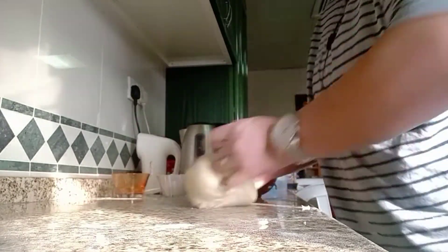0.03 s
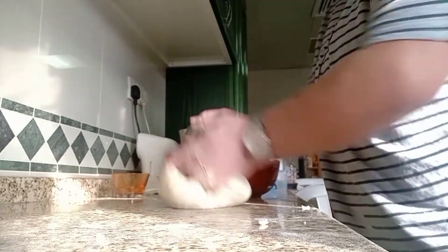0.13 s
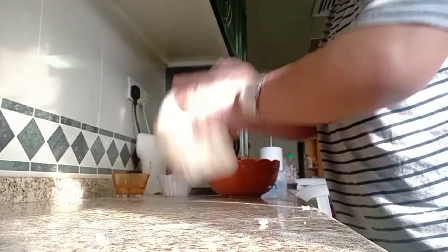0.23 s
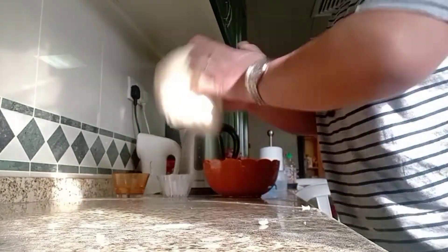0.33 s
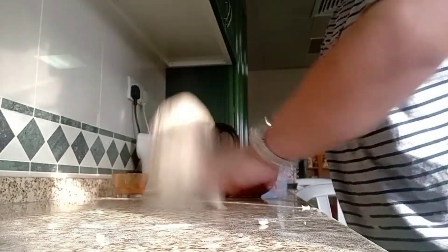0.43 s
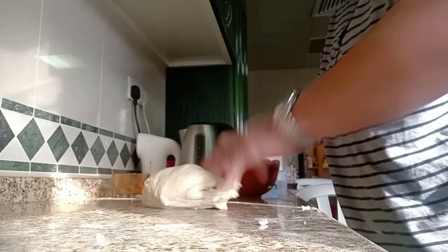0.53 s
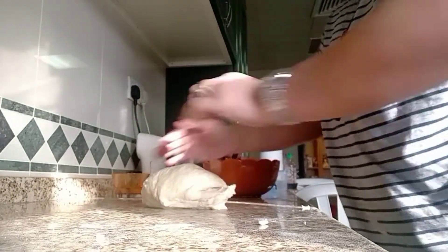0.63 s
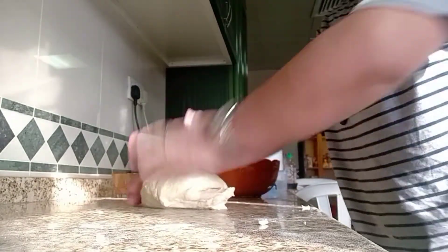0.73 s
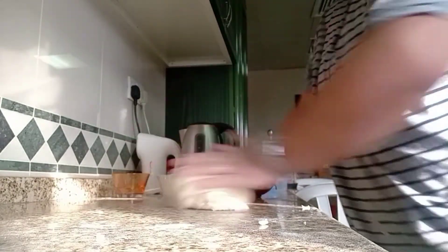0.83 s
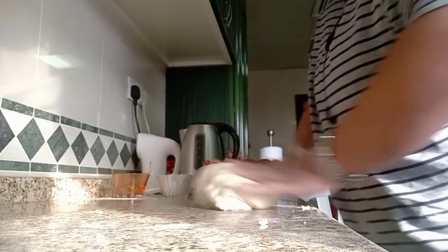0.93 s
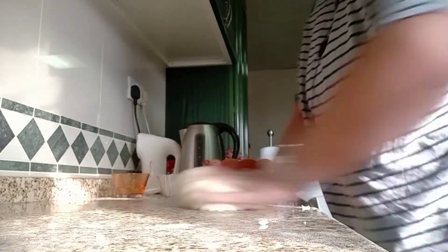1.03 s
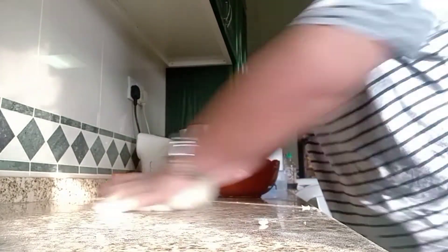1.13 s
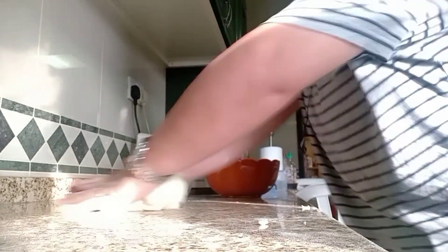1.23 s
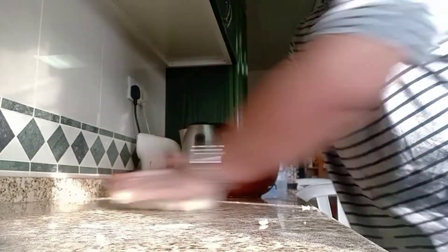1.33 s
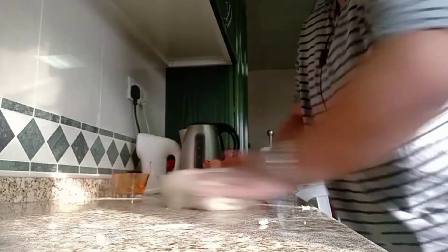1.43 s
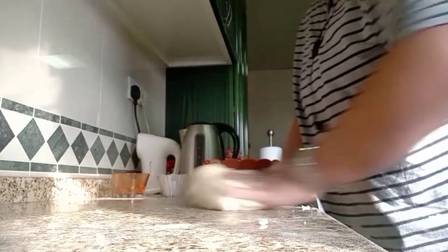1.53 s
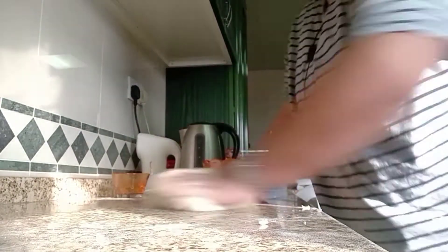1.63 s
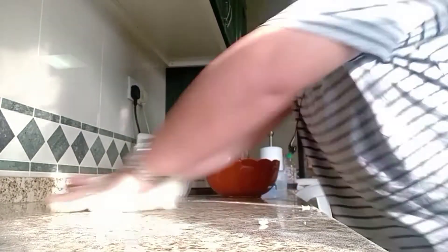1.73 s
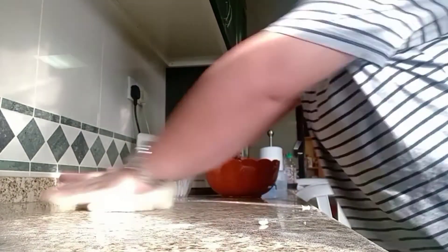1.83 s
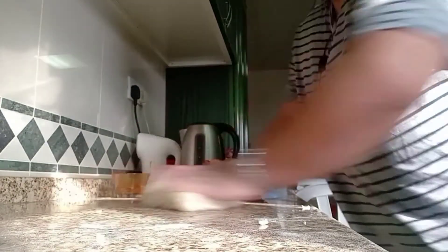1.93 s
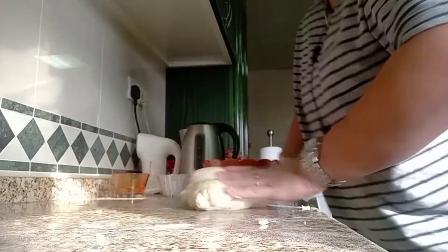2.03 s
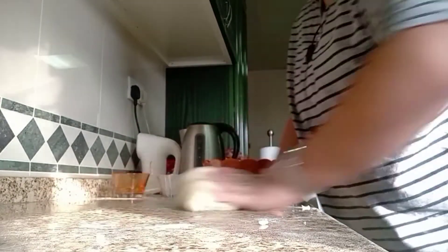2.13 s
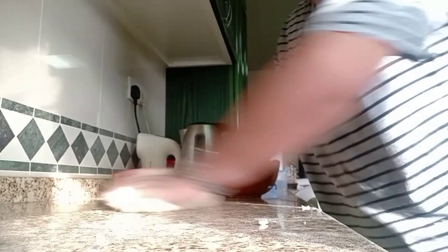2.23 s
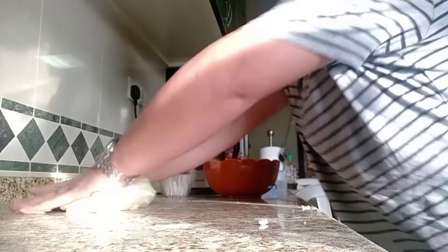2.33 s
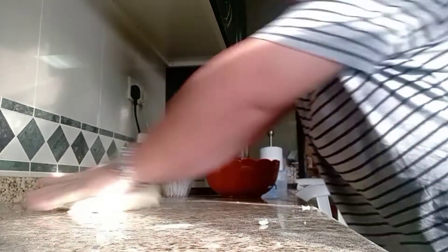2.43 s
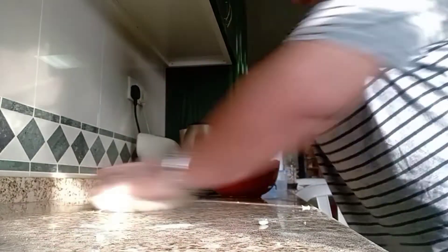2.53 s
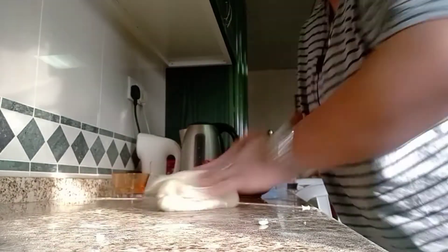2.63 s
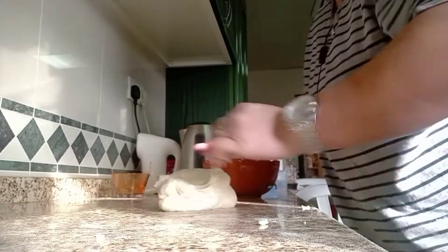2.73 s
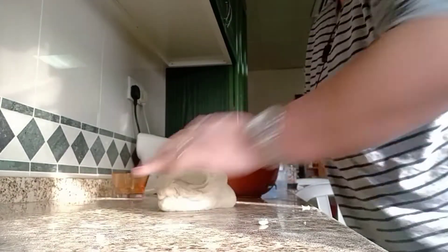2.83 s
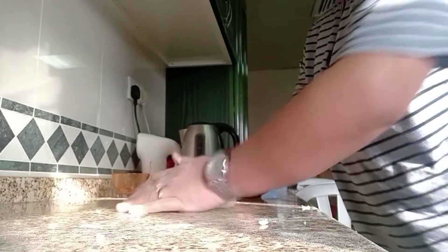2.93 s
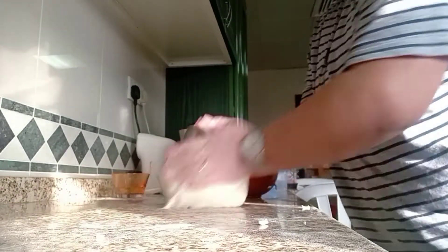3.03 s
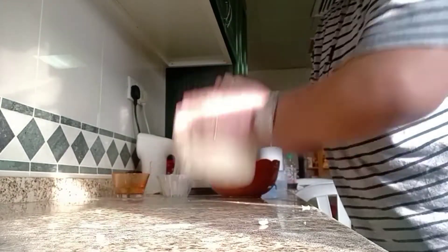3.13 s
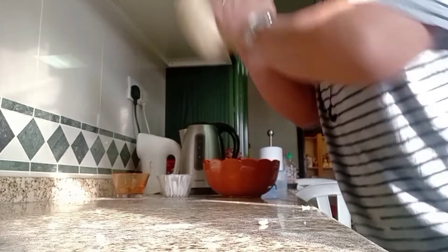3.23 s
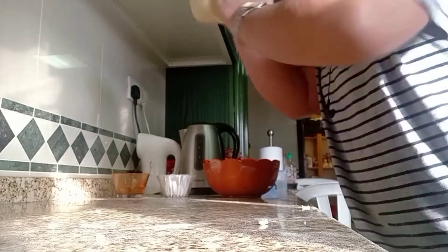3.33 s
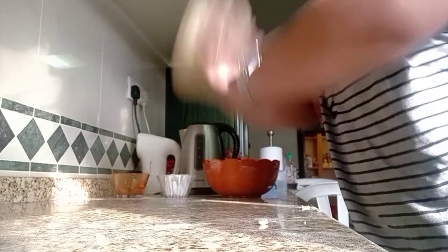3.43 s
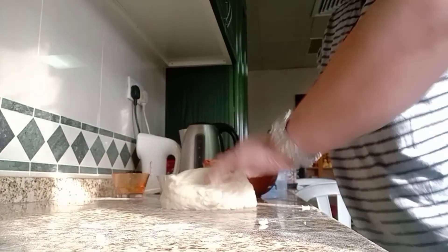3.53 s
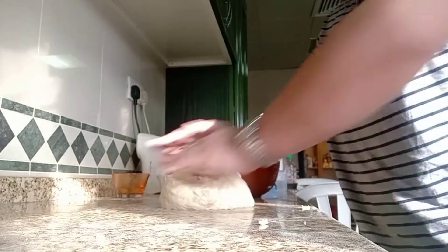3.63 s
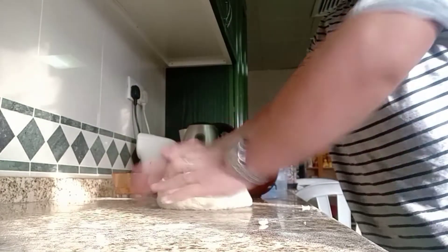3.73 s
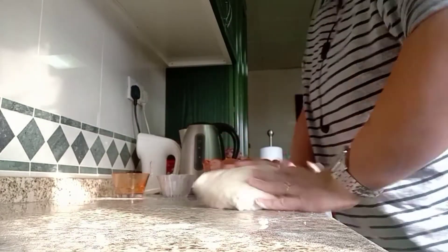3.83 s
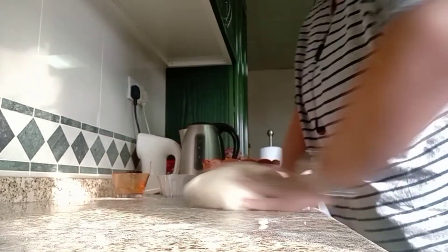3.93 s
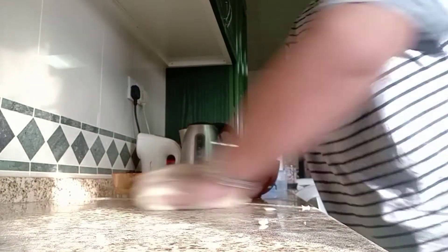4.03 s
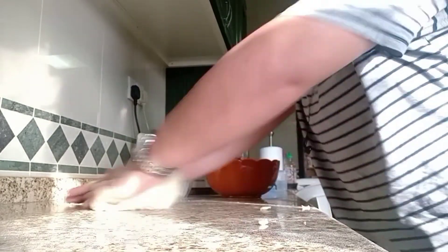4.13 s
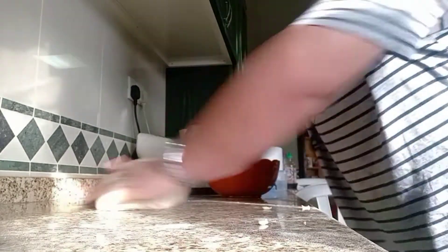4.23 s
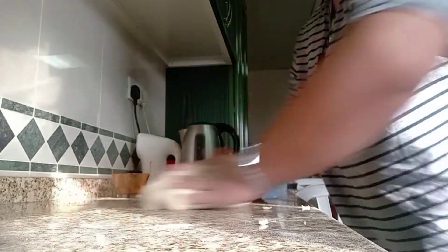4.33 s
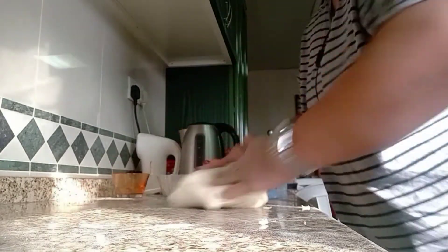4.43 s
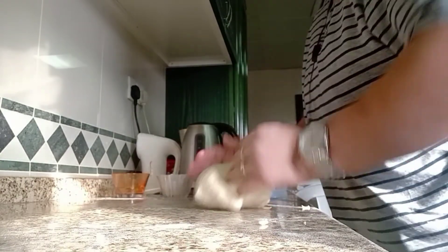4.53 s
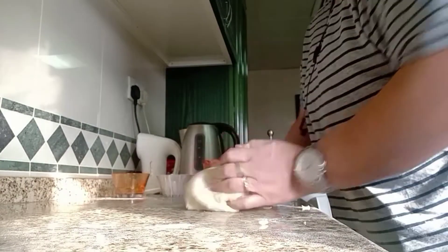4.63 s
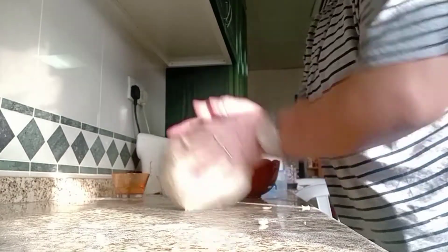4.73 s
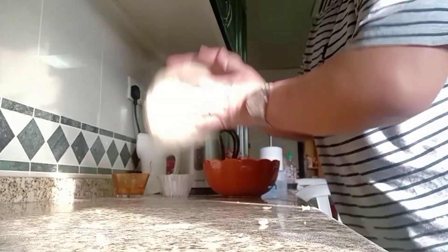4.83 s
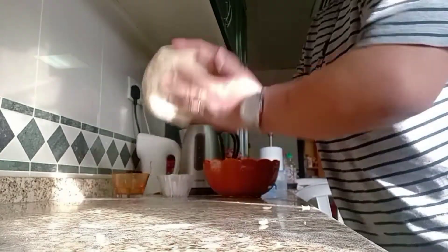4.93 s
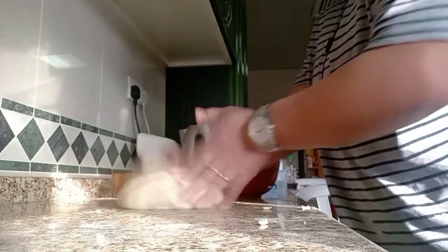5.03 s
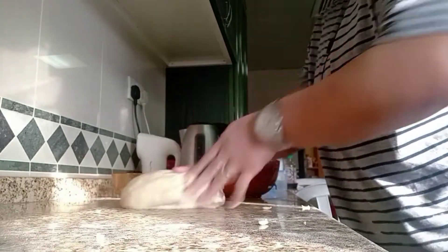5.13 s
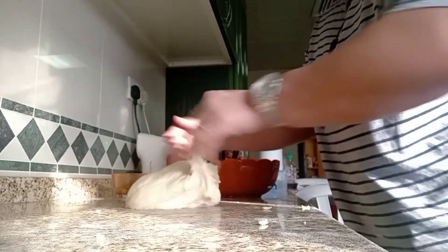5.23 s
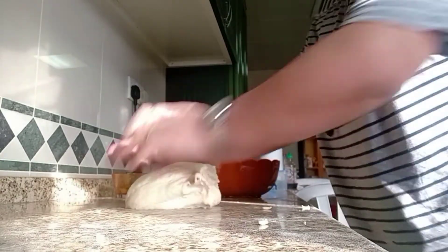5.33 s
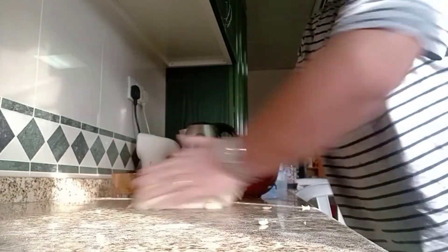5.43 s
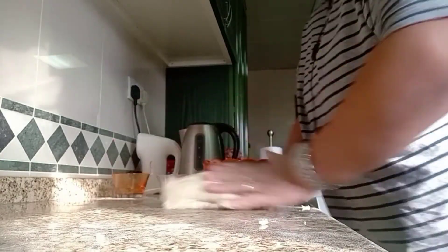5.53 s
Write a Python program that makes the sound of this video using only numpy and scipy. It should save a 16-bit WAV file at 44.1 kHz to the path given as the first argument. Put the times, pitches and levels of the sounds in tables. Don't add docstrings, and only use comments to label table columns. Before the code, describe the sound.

A low, wavering hum around 100 Hz, soft airy noise and a faint thin whine from an appliance run throughout, very quiet. Palms brush lightly over a floured stone counter at the start. At 0.4 s dough hits the counter: a loud, sharp wet clap with a hollow wooden knock, a low cabinet thump and a lively tiled-room ring of under a second. A small finger pat follows at 0.75 s. From about 0.85 to 3.1 s soft, uneven hisses of skin and dough come in strokes, several a second at times, with a dull push near 2.8 s. A softer, more midrange slap lands at 3.4 s, then a sticky tick and push at 3.7 s and more rubbing until 4.8 s, with a muffled push at 4.55 s. At 5.0 s a heavy slap booms; sticky pats at 5.3 s and a faint rub end it.

```python
import sys
import numpy as np
from scipy import signal
from scipy.fft import rfft, irfft, next_fast_len
from scipy.io import wavfile
from scipy.ndimage import uniform_filter1d, map_coordinates

SR = 44100
rng = np.random.default_rng(int(sys.argv[2]) if len(sys.argv) > 2 else 0)


def how_loud(loudness_db):
    steps = np.asarray(loudness_db, float) / 20
    return 10 ** steps


def transcribe(u):
    v = np.clip(np.atleast_2d(u).T, -1, 1)
    q = np.round(v * 32767).astype(np.int16)
    wavfile.write(sys.argv[1], SR, q)


N = 246078

# freq_hz, density_db (per Hz)
SKIN_COLOUR = [(1710, -22.5), (2900, -1), (3340, -2), (3680, -5), (4040, -3), (4440, -6.5), (6250, 1),
               (7500, -5), (8100, -19), (9000, -28), (11700, -47.5), (19800, -120)]
# freq_hz, density_db (per Hz)
FIZZ_COLOUR = [(5000, -31), (8500, 1.5), (10700, -6), (11600, -4), (12800, -6), (14900, 1), (15600, -0.5)]


def unit(x):
    return x / np.sqrt(np.mean(x ** 2) + 1e-20)


def along(points, hz):
    f, v = np.transpose(points)
    return np.interp(np.log(hz + 1), np.log(f + 1), v)


def shade(points):
    return lambda hz: how_loud(along(points, hz))


def wobble(rate):
    knots = rng.standard_normal(int(N * rate / SR) + 4)
    return map_coordinates(knots, [np.arange(N) * rate / SR])


def rush(gain, size=N):
    # freq_hz, left_right_likeness (-1 to 1)
    likeness = [(60, 0.99), (130, 0.86), (290, 0.74), (640, 0.31), (1410, -0.23), (3100, 0.12),
                (6820, -0.12), (15000, 0.51)]
    # freq_hz, left_over_right_db
    tilt = [(60, 5.5), (110, 1.5), (200, 7), (380, -3.5), (700, 2.5), (1290, 1), (2380, 4), (4400, -2),
            (8120, 4.5), (15000, 13.5)]
    m = next_fast_len(size + 8192)
    hz = np.fft.rfftfreq(m, 1 / SR)
    turn = np.arccos(np.clip(along(likeness, hz), -1, 1)) / 2
    noise = rfft(rng.standard_normal((2, m)))
    mid, side = noise * gain(hz) * [np.cos(turn), np.sin(turn)]
    balance = how_loud(along(tilt, hz) / 2)
    return unit(irfft([(mid + side) * balance, (mid - side) / balance], m)[:, :size])


def patchy(x, depth_db):
    z = signal.stft(x, nperseg=512)[2]
    field = rng.standard_normal(z.shape[1:])
    field = uniform_filter1d(field, size=4, axis=0)
    field = uniform_filter1d(field, size=12, axis=1)
    return signal.istft(z * how_loud(depth_db * unit(field)), nperseg=512)[1][:, :N]


def swells(rows, rest_db, bend):
    t = np.arange(0, N, 32) / SR
    power = how_loud(2 * rest_db)
    for s, rise, fall, db in rows:
        distance = np.where(t < s, (s - t) / rise, (t - s) / fall)
        power = power + how_loud(2 * (db - 14 * distance ** bend))
    return np.interp(np.arange(N) / SR, t, 10 * np.log10(power))


def ring(t, hz, rise, t60):
    return np.sin(2 * np.pi * hz * t) * (1 - np.exp(-(t / rise) ** 2)) * how_loud(-60 * t / t60)


def snap(colour, size):
    gain = how_loud(along(colour, np.fft.rfftfreq(size, 1 / SR)))
    cepstrum = irfft(np.log(gain + 1e-5))
    cepstrum[1:size // 2] *= 2
    pulse = irfft(np.exp(rfft(cepstrum[:size // 2], size)))
    return pulse / np.abs(pulse).max()


def tail(colour, size):
    # freq_hz, t60_s
    decay_times = [(60, 1), (100, 0.63), (250, 0.33), (700, 0.58), (1500, 0.82), (2600, 0.88), (3600, 0.78),
                   (6000, 0.8), (10000, .45)]
    hz, t, z = signal.stft(rush(shade(colour), size=size), SR, nperseg=512)
    decay = how_loud(-60 * t / along(decay_times, hz)[:, None])
    return signal.istft(z * decay, SR, nperseg=512)[1][:, :size]


def add(track, s, sound):
    part = track[:, round(s * SR):round(s * SR) + sound.shape[-1]]
    part += sound[..., :part.shape[1]]


def hum(load_db):
    # strongest_s, rise_s, fall_s, level_db
    surges = [(.03, 0.035, 0.021, -44.5), (.2, 0.039, 0.029, -46.5), (.72, 0.044, 0.14, -58),
              (1.3, 0.12, .12, -51.5), (1.7, 0.097, 0.27, -53.5), (1.93, .05, 0.054, -48.5),
              (2.1, 0.088, 0.053, -50), (2.25, 0.024, 0.065, -53), (2.375, .05, .05, -52),
              (2.47, 0.019, 0.02, -47.5), (2.7, .15, 0.064, -53), (2.99, 0.037, 0.028, -50),
              (3.68, .04, 0.16, -51), (3.9, 0.095, .08, -55.5), (4.15, .08, 0.28, -53.5),
              (4.45, .05, 0.13, -53.5)]
    pitch_hz = 102.6 + 3.2 * wobble(14)
    tone = np.sqrt(2) * np.sin(2 * np.pi * np.cumsum(pitch_hz) / SR)
    rest_db = -56.5 + (load_db + 3.0 * wobble(11))[::32]
    level_db = swells(surges, rest_db, bend=2.6) + 2.7 * wobble(25)
    return how_loud(level_db) * tone * how_loud([[1.7], [-1.7]])


def rumble(load_db):
    # freq_hz, density_db (per Hz)
    colour = [(20, -41), (40, -23.5), (55, -14.5), (72, -6.5), (100, -8.5), (140, -2), (165, -6),
              (190, -13), (205, -11), (235, -31.5), (300, -44), (500, -120)]
    level_db = -56 + 0.56 * load_db + 0.57 * wobble(23.0)
    return how_loud(level_db) * rush(shade(colour))


def air(load_db):
    # freq_hz, density_db (per Hz)
    colour = [(130, -38.5), (220, -7.5), (343, -12.5), (447, -6.5), (646, -7.5), (807, -8.5), (977, -11.5),
              (1120, -6), (1480, -13), (1590, -12), (2440, -14.5), (2960, -26), (4960, -35.5), (6470, -27),
              (7600, -33.5), (8200, -52), (15500, -59.5), (16500, -120)]
    level_db = -59.5 + 0.7 * load_db + .7 * wobble(3.7)
    return how_loud(level_db) * patchy(rush(shade(colour)), depth_db=2.0)


def whine():
    # centre_hz, width_hz, level_db
    bands = [(430, 32, -73), (1064, 14, -77), (1132.4, 19, -67.5), (2430, 60, -79.5)]
    return sum(how_loud(db) * rush(lambda f: 1 / (1 + (2 * (f - hz) / width) ** 2)) for hz, width, db in bands)


def room():
    # time_s, level_db
    drive = [(0, 1.5), (.95, -4), (1.3, -1), (1.8, 2), (2.6, 0.5), (3.3, 1.5), (4.3, -0.5), (4.9, -0.5),
             (5.58, 1.5)]
    s, db = np.transpose(drive)
    load_db = np.interp(np.arange(N) / SR, s, db)
    return hum(load_db) + rumble(load_db) + air(load_db) + whine()


def palms():
    # strongest_s, rise_s, fall_s, level_db
    strokes = [(.138, 0.093, .025, -62.5), (.19, .05, .1, -74.5), (.395, .01, .02, -69.5),
               (.85, 0.12, .1, -66), (1.11, 0.14, 0.15, -64), (1.31, 0.094, .14, -61),
               (1.64, 0.15, 0.11, -66.5), (1.88, 0.13, .16, -61), (2.04, 0.079, 0.14, -67.5),
               (2.24, 0.18, 0.11, -67.5), (2.385, 0.036, 0.096, -63.5), (2.51, 0.12, 0.081, -62.5),
               (2.525, 0.0073, .007, -61), (2.6, .05, 0.089, -76), (3.666, .015, 0.0032, -54),
               (2.86, 0.065, .1, -61), (3.0, 0.052, 0.057, -61), (3.39, 0.038, 0.041, -64),
               (3.78, 0.075, 0.12, -67.5), (3.93, 0.083, .05, -62.5), (4.04, 0.1, 0.092, -65),
               (4.21, 0.064, 0.21, -64), (4.37, 0.14, 0.093, -66), (4.56, 0.044, .03, -73.5),
               (4.7, 0.094, .045, -63), (4.78, .05, 0.066, -75), (5.45, 0.15, 0.11, -67.5),
               (5.565, 0.023, 0.042, -64.5)]
    # freq_hz, density_db (per Hz)
    drag_colour = [(250, -43.5), (500, -9), (1100, -13), (2000, 1.5), (2600, 0.5), (3200, -31),
                   (4500, -120)]
    rub_db = swells(strokes, -87.5, bend=2.4)
    hiss = how_loud(rub_db + 0.63 * wobble(75)) * patchy(rush(shade(SKIN_COLOUR)), depth_db=-1.5)
    slow_db = uniform_filter1d(rub_db, size=SR // 12)
    drag = how_loud(-69.5 + 0.87 * (slow_db + 70)) * rush(shade(drag_colour))
    fizz_db = -86.0 + 1.4 * (rub_db + 70.5)
    fizz = how_loud(fizz_db) * patchy(rush(shade(FIZZ_COLOUR)), depth_db=-1.0)
    return hiss + drag + fizz


def clap(t, colour, spread_db):
    edge = -2.2 * snap(colour, size=SR) * (1 - np.exp(-t / .0002)) * how_loud(-60 * t / .012)
    swell = 1 - np.exp(-t / .0015)
    patch = how_loud(spread_db) * swell * how_loud(-60 * t / 0.048) * rush(shade(colour), size=SR)
    highpass = signal.butter(2, 380, "high", fs=SR, output="sos")
    return edge + signal.sosfilt(highpass, patch)


def thump(t, hz, thump_db, knock_db):
    low = how_loud(thump_db + 10.5) * ring(t, hz, .006, 0.077)
    knock = ring(t, 425, 0.0073, 0.067) + 0.34 * ring(t, 545, 0.003, 0.047)
    return (low + how_loud(knock_db + 4.5) * knock) * how_loud([[1.2], [-1.2]])


def answer(t, colour, far_db, sheen_db, boom_db):
    # freq_hz, density_db (per Hz)
    sheen = [(4410, -26.5), (7500, -5.5), (10100, -8), (10500, -13), (12400, -14.5), (14800, -15.5),
             (15600, -12.5)]
    # freq_hz, density_db (per Hz)
    boom = [(35, -40), (60, -15), (85, -10), (110, -3), (150, -15), (200, -14), (300, -10.5), (450, -67)]
    returned = how_loud(far_db) * tail(colour, size=SR)
    returned = returned + how_loud(sheen_db) * tail(sheen, size=SR) + how_loud(boom_db) * tail(boom, size=SR)
    return (1 - np.exp(-(t / .008) ** 2)) * returned


def slaps():
    # start_s, clap_peak_db, thump_db, thump_hz, knock_db
    blows = [
        (0.421, -0.5, -17, 100.5, -11),
        (3.416, -4, -20.5, 83.5, -26.5),
        (4.993, -3.5, -15.5, 91, -43),
    ]
    # freq_hz, density_db (per Hz)
    clap_colours = [
        [(220, -32.5), (380, 5.5), (543, -22), (850, -7), (1090, -18), (1700, -10), (2100, -6.5), (2740, -14),
         (3560, -17), (4940, -16), (5510, -19), (6040, -16.5), (7400, -35.5), (12000, -51.5), (15600, -47)],
        [(220, -6), (380, -21), (560, 7.5), (760, -4.5), (966, 11), (1150, -9), (1400, 2.5), (1640, -4),
         (2130, 5), (2420, -42), (2960, -10), (3250, -10), (4790, -11.5), (6240, -8.5), (9200, -33),
         (15600, -43)],
        [(220, -66), (380, -13), (590, 1.5), (690, -29), (840, 1), (1000, -9.5), (1400, -14), (2070, -2.5),
         (2200, -42), (2340, -19), (2900, -9.5), (3200, -20.5), (4710, -19), (6140, -11), (8380, -36),
         (13100, -49), (15600, -45)],
    ]
    # freq_hz, density_db (per Hz)
    wall_colours = [
        [(190, -38.5), (330, -11), (535, 1.5), (579, -13), (752, -11.5), (835, -7), (1000, -20), (1250, -20.5),
         (1780, -7.5), (2060, -11), (2570, -6), (3560, -24), (3850, -19.5), (6080, -24.5), (7500, -33.5),
         (9750, -57.5), (16500, -120)],
        [(190, -63), (330, -21), (488, -0.5), (528, 4), (579, -4), (752, -9.5), (939, -7), (1250, -14),
         (1880, -12.5), (2080, -11), (2280, -11), (2670, -17.5), (4620, -27), (6160, -23), (7500, -32),
         (9750, -60), (16500, -120)],
        [(190, -45), (330, -6.5), (495, -8), (535, 2.5), (686, -4), (846, 1), (1160, -8.5), (1320, -16.5),
         (1980, -4.5), (2370, -14), (2740, -8.5), (3250, -15), (4870, -21), (6160, -9.5), (7500, -28.5),
         (9750, -41), (16500, -120)],
    ]
    # tail_db, sheen_db, spreading_contact_db, room_boom_db
    after_levels = [
        (-23, -55, -3.5, -33.5),
        (-28.5, -64, -8.5, -36.5),
        (-24.5, -53.5, -3, -31.5),
    ]
    out, t = np.zeros((2, N)), np.arange(SR) / SR
    puff_size = SR // 50
    for blow, near, far, levels in zip(blows, clap_colours, wall_colours, after_levels):
        s, db, thump_db, hz, knock_db = blow
        far_db, sheen_db, spread_db, boom_db = levels
        puff = np.linspace(0, 1, num=puff_size) ** 3 * rush(shade(SKIN_COLOUR), size=puff_size)
        add(out, s - 1 / 50, how_loud(db - 46.5) * puff)
        impact = how_loud(db) * clap(t, near, spread_db) + thump(t, hz, thump_db, knock_db)
        add(out, s + 1 / 3000, impact + answer(t, far, far_db, sheen_db, boom_db))
    return out


def fingers():
    # start_s, peak_db, body_db, length_s, body_hz
    pats = [(.748, -38, -52, .007, 2300), (2.654, -60, -70, .008, 1500), (2.812, -52, -42, .012, 1300),
            (3.005, -49, -60, .008, 1500), (3.413, -27, -22, .004, 2200), (3.667, -30, -38, .008, 1900),
            (3.678, -46, -44, .02, 900), (5.305, -48, -40, .02, 2000), (5.3187, -35, -29, .006, 1700),
            (5.32, -50, -40, .04, 430), (5.322, -60, -40, .03, 1700), (5.3468, -44, -35, .006, 1700)]
    out, t = np.zeros((2, N)), np.arange(SR // 3) / SR
    for s, db, body_db, length, body_hz in pats:
        onset = 1 - np.exp(-(t / (.11 * length)) ** 2)
        decay = how_loud(-20 * t / np.clip(length, .002, .05)) + 0.061 * how_loud(-60 * t / 0.47)
        body = rush(lambda hz: np.exp(-(np.log((hz + 1) / body_hz) / 0.69) ** 2), size=len(t))
        skin = rush(shade(SKIN_COLOUR), size=len(t)) + 0.067 * rush(shade(FIZZ_COLOUR), size=len(t))
        add(out, s, onset * decay * (how_loud(db) * skin + how_loud(body_db) * body))
    return out


def pushes():
    # start_s, peak_db, pitch_hz
    shoves = [
        (2.812, -38.5, 113),
        (3.662, -42, 110),
        (4.546, -38, 100.6),
    ]
    out, t = np.zeros((2, N)), np.arange(SR // 3) / SR
    for s, db, hz in shoves:
        add(out, s, how_loud(db + 13.5) * ring(t, hz, 0.0089, 0.1) * how_loud([[1.5], [-1.5]]))
    return out


def scene():
    return room() + palms() + slaps() + fingers() + pushes()


def roll_off(x):
    return signal.sosfilt(signal.butter(12, 16610, fs=SR, output="sos"), x)


def record(dry):
    kept = signal.sosfilt(signal.butter(1, 60, "high", fs=SR, output="sos"), dry)
    kept = signal.sosfilt(signal.ellip(10, .3, 60, 15700, fs=SR, output="sos"), kept)
    return roll_off(kept)


dry = scene()
out = record(dry)
transcribe(out)
```